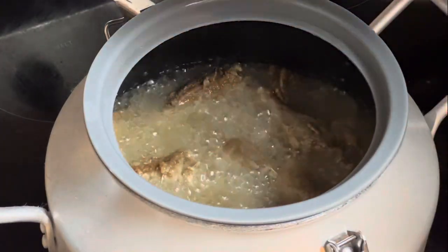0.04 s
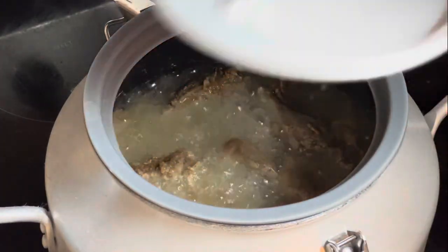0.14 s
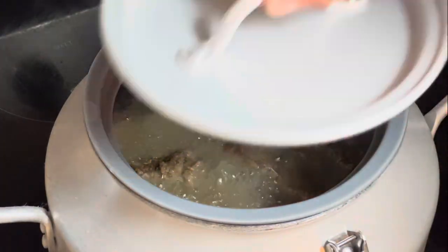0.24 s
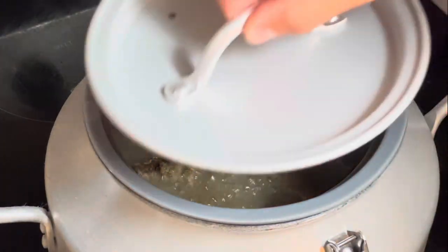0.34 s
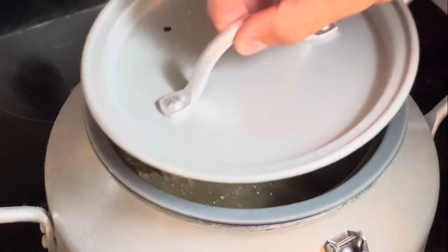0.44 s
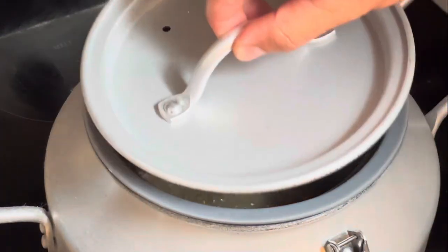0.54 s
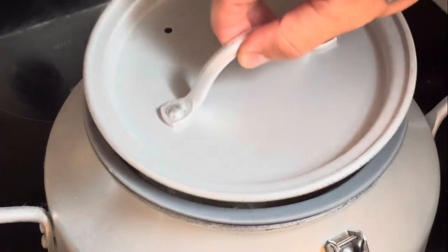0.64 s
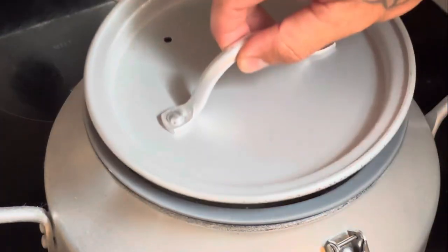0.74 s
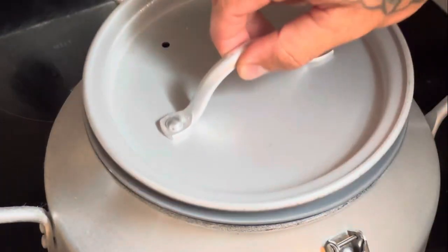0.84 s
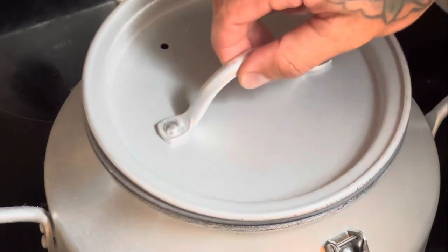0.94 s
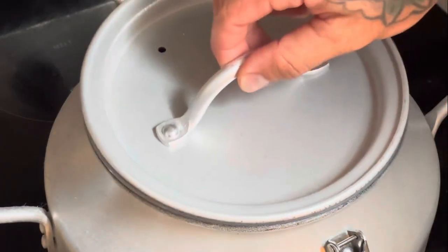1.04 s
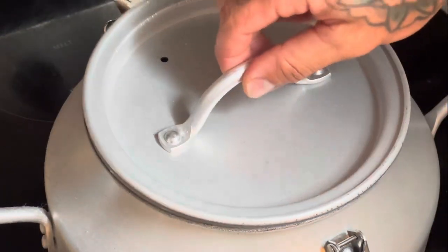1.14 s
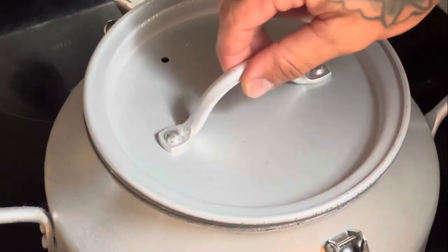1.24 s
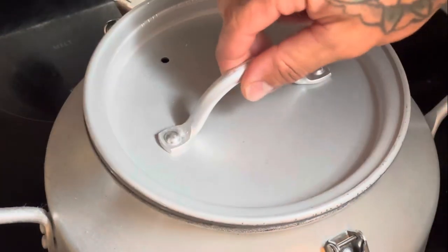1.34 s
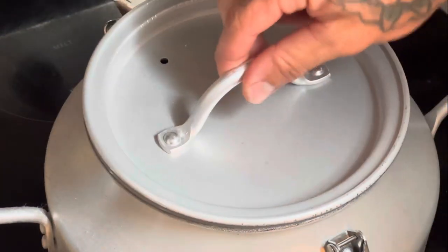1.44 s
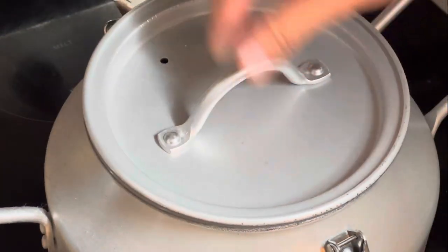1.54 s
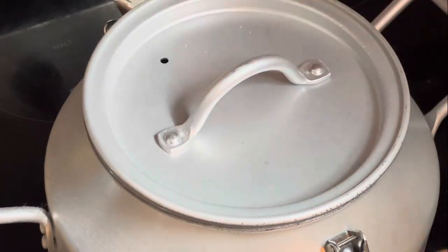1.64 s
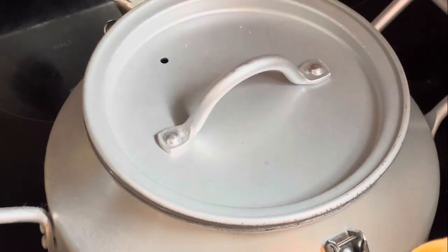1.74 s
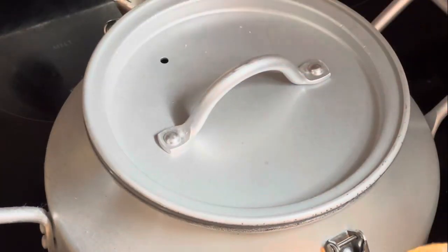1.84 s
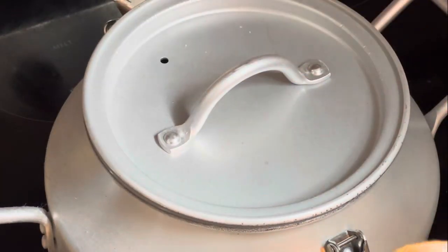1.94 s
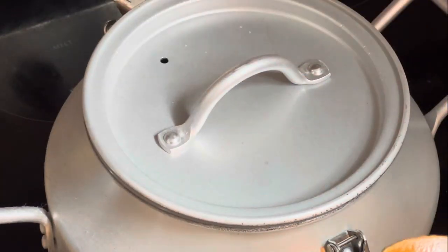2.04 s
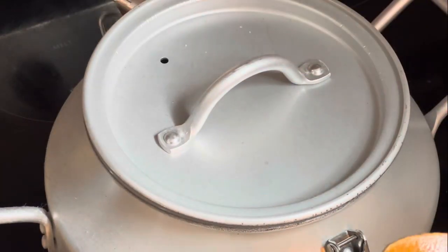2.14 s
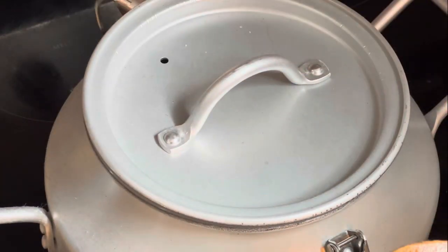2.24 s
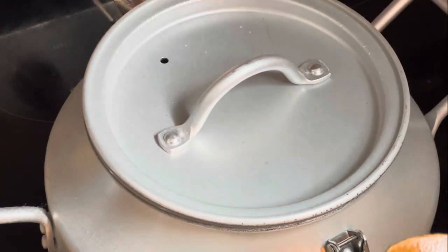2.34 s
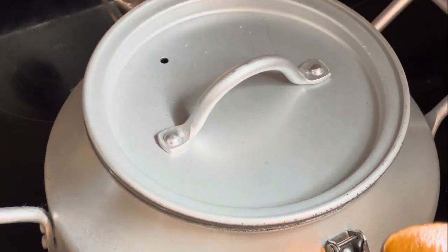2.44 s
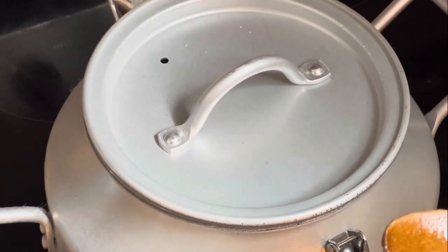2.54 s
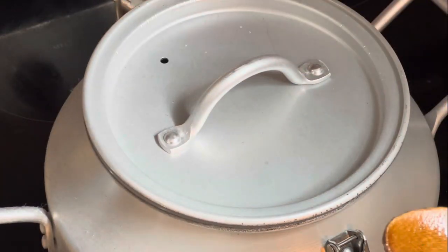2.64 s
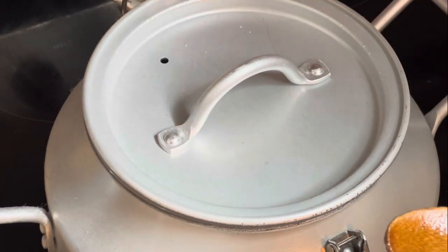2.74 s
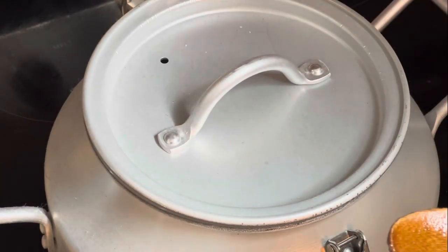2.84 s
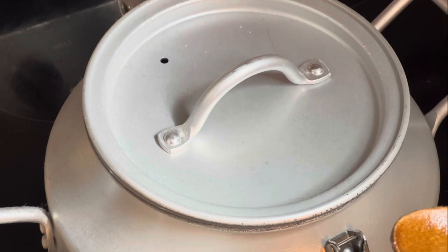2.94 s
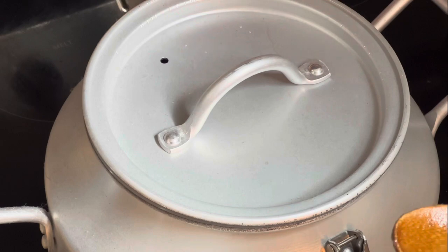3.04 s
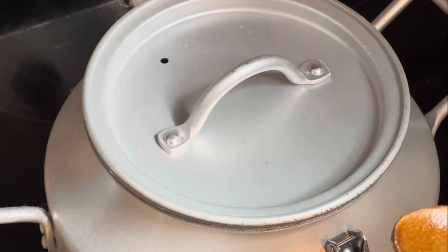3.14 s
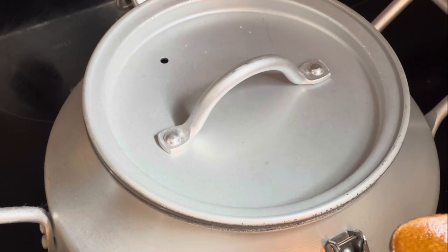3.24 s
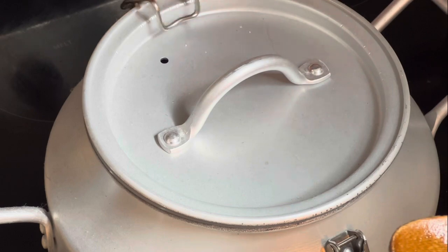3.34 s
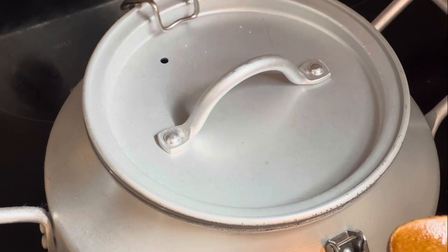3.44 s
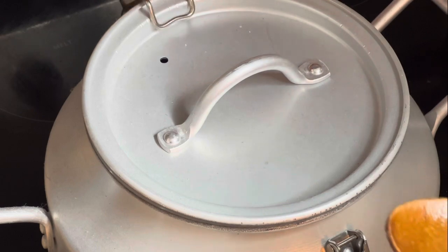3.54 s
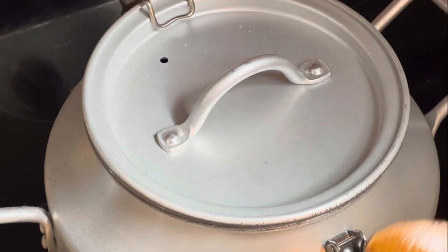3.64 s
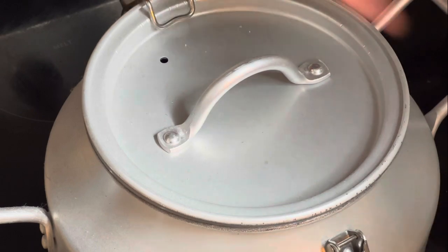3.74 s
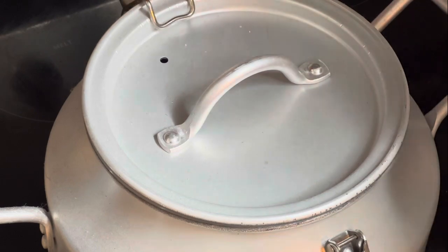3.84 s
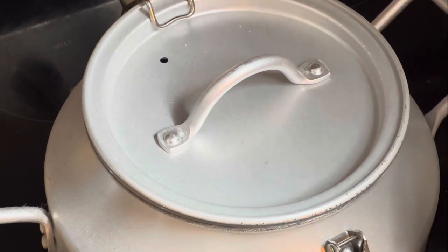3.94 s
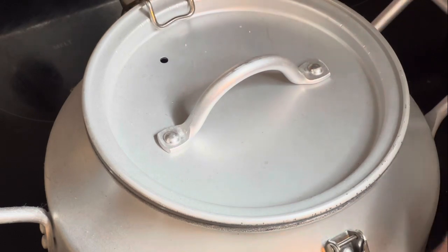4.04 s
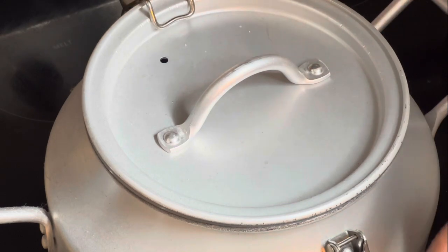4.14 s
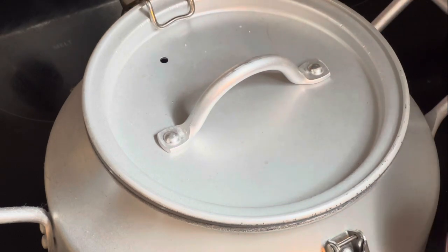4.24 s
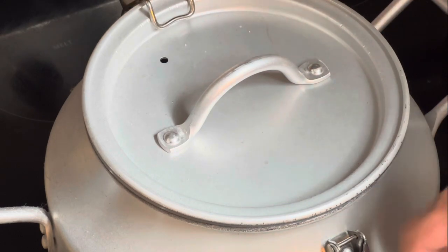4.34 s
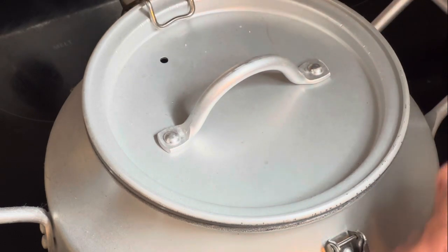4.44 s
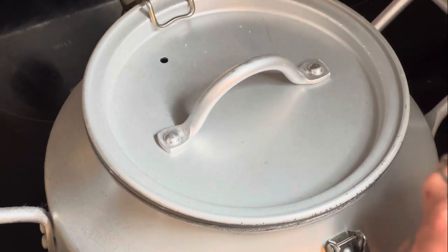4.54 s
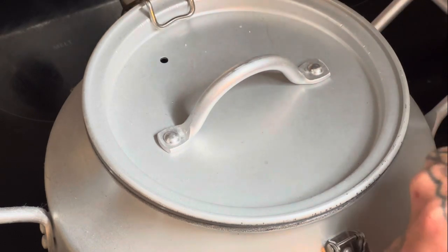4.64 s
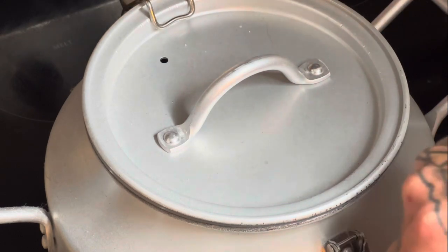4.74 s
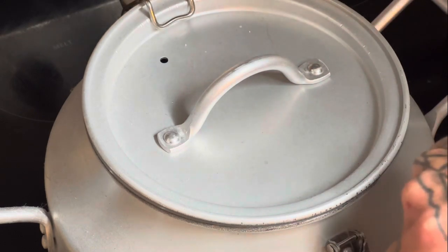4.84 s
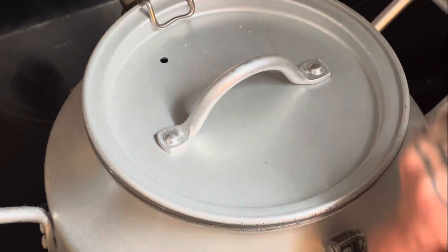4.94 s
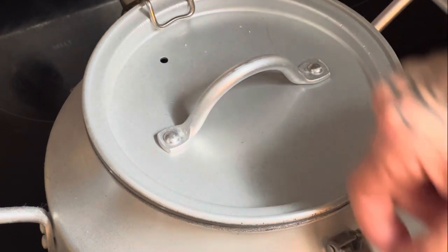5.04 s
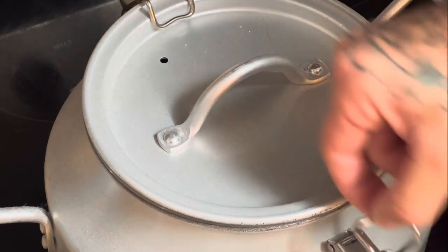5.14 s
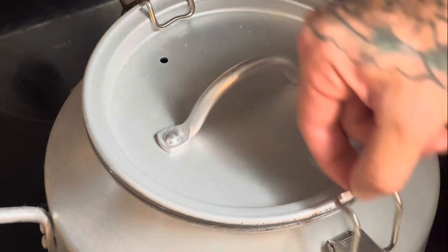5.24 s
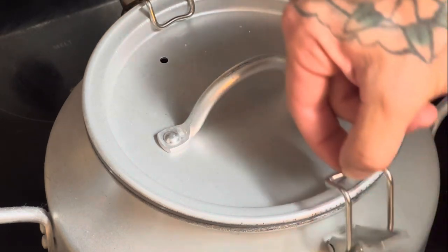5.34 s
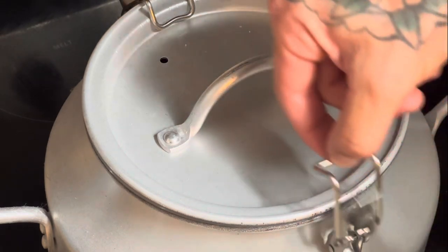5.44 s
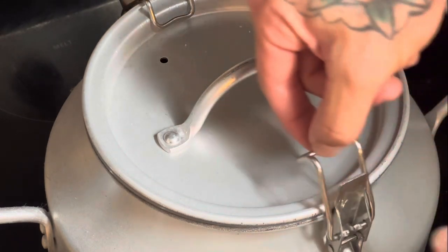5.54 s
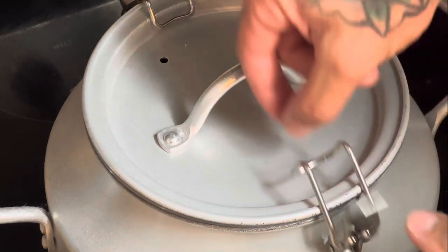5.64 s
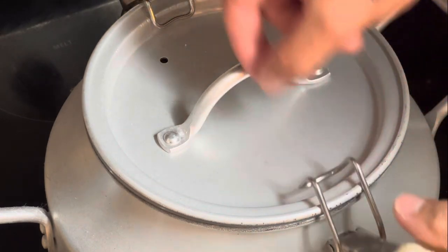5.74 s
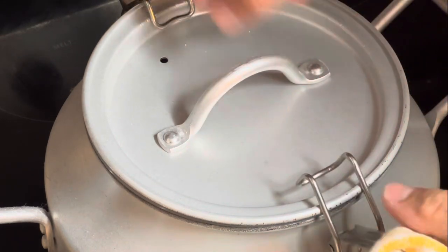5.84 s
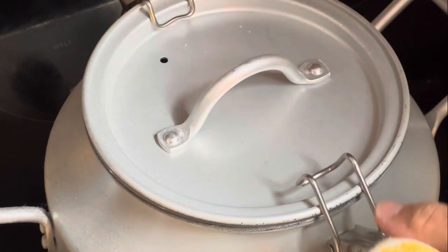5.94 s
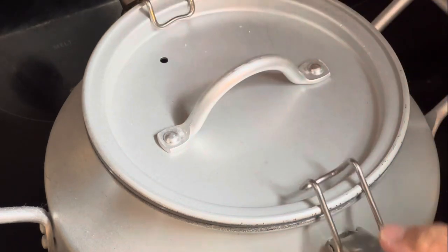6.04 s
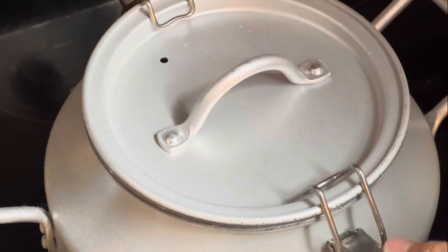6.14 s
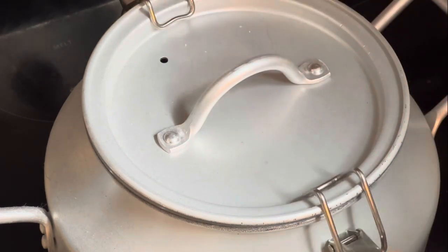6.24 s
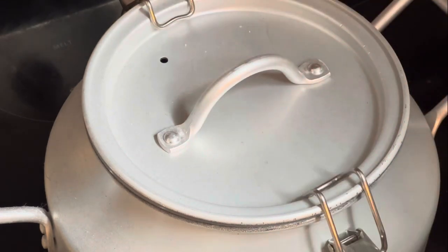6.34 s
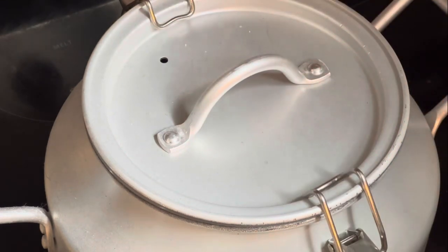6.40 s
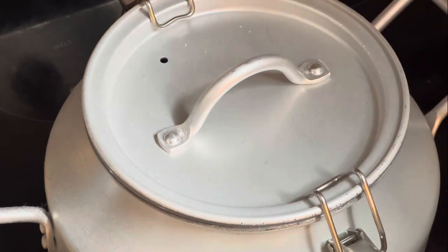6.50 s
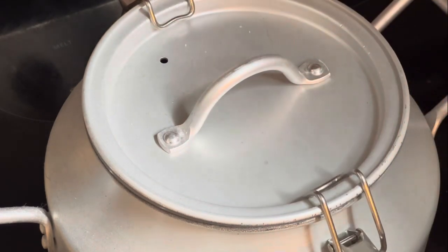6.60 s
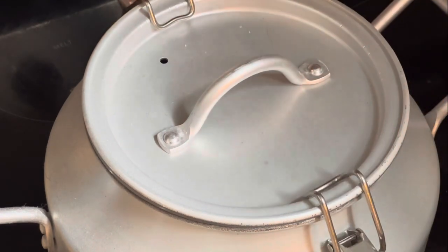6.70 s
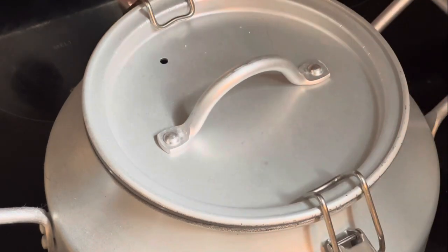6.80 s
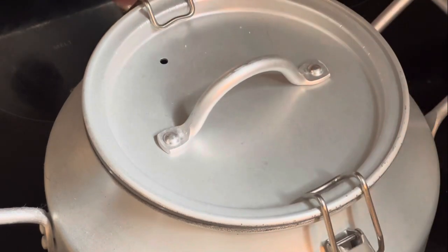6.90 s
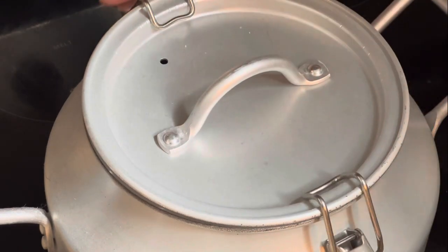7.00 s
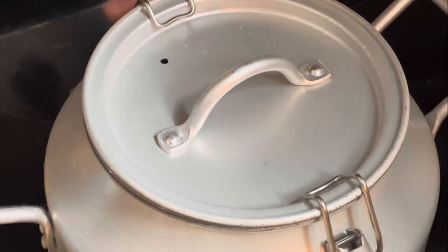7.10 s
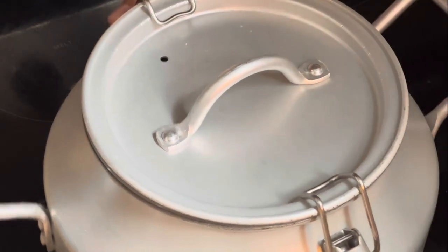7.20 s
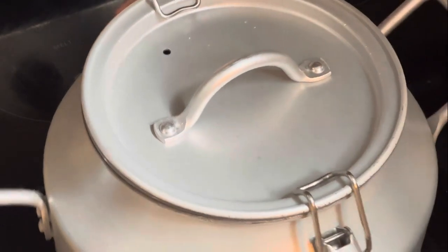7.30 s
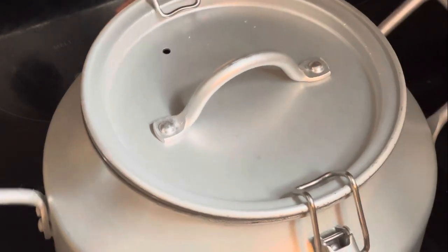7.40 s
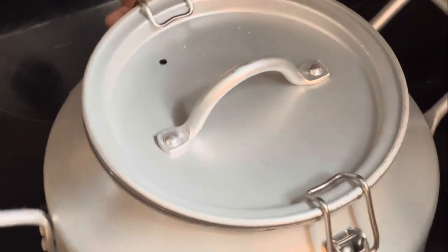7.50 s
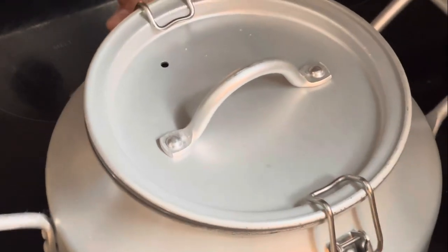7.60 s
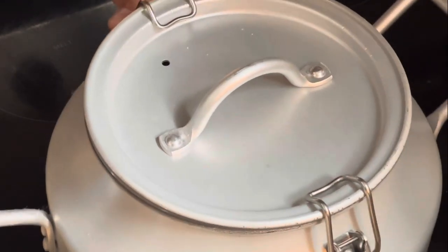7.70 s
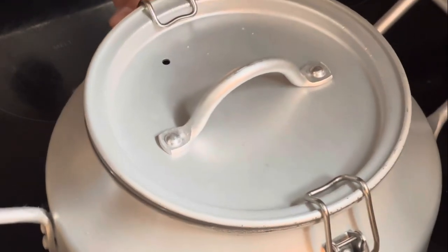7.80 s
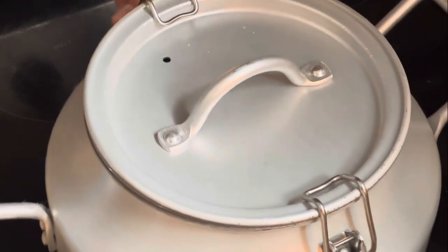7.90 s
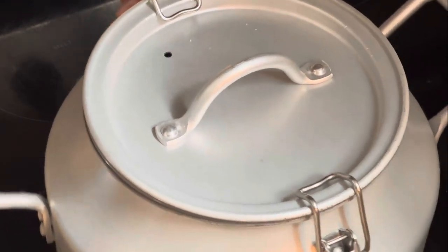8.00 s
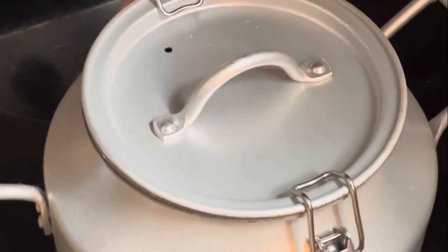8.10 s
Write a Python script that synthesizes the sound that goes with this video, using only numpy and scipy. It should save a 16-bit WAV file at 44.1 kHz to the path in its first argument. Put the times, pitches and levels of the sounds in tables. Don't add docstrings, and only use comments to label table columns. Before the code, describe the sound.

Close stereo view of a metal can on a stove in a small kitchen. At the start meat sizzles brightly in oil, a dense, fine fizz. Within the first second a lid descends; the can's hollow air note slides down and the sizzle becomes softer. Around 0.9-1.2 s the rim meets the gasket with a light tick and low soft bumps. Quiet frying continues with scattered sharp spits and dull pops. At 2.7 s a far wire latch taps the lid and springs back, drops harder at 3.3 and bounces with a thud at 3.5. The near wire clatters at 5.5-5.7, with a faint touch at 6.3 and a soft knock at 6.7. The loudest lever snap cracks at 7.1, rocking the can; a weaker one follows at 7.5. Low stove rumble swells with handling, a far motor rises and falls around 3-4.5, and a faint fridge hum enters near 4.5.

```python
import sys
import numpy as np
from scipy import signal
from scipy.fft import rfft, irfft
from scipy.io import wavfile

SR = 44100
rng = np.random.default_rng(int(sys.argv[2]) if len(sys.argv) > 2 else 0)


def store_pcm(level_fs):
    pcm = np.round(np.clip(level_fs, -1, 1) * 32767).astype(np.int16)
    wavfile.write(sys.argv[1], SR, np.atleast_2d(pcm).T)


def gain_from_decibels(decibels):
    exponent = np.asarray(decibels, float) / 20
    return 10 ** exponent


N = 359856

CROSS_HZ = 1040

# pitch_hz, level_db, t60_s (time to fade by 60 dB)
LID = [(315, -8, 0.05), (656, -3, 0.043), (1140, -6, 0.05), (3520, 13, 0.06), (4220, 9, 0.089),
       (4680, 4.5, 0.08), (5580, 1.5, 0.2), (5980, 12, 0.07), (6303, 6, .07), (7500, 2, 0.05)]
CAN = [(372, 8, 0.07), (505, 3, 0.13), (1017, -3, .2), (1098, 6, 0.07), (834, -3, .15), (1564, 8, 0.06),
       (2050, 7, .07), (2672, 9, 0.06), (2720, -8, .25), (2982, 0, 0.2), (3090, -2, .2), (3850, 4, 0.17),
       (4694, -2, .15), (8430, 11, 0.078)]
FAR_WIRE = [(1065, -2, 0.12), (1148, 0, 0.13), (1195, 12, 0.16), (2097, 0, 0.16), (3186, 5, 0.12),
            (4148, 8, 0.09), (5372, 8, .06), (6070, 3, .06), (6309, 2, 0.1), (7020, 2, .08),
            (7488, 11, 0.08), (8870, 9, 0.09), (9262, 2, .12), (10917, 11, .07)]
FAR_REBOUND = [(487, 4, .1), (1145, 4, .12), (1192, 9, .19), (2099, -6, .19), (2915, 0, .25),
               (3186, 3, .15), (8333, 5, .1), (4150, -4, .2), (5264, -2, .12), (5620, -6, .25),
               (6266, -1, .15), (6790, -2, .25), (7472, 0, .2), (9092, 4, .1)]
FAR_DROP = [(168, -6, 0.19), (1090, -1, 0.2), (1140, 2, .2), (1195, 10.5, 0.26), (1275, -9, .08),
            (2094, 1.5, 0.17), (3189, 3, 0.18), (4770, -10, .24), (5184, 4, .07), (5612, -6, .15),
            (6411, 5, .06), (7020, -5, 0.17), (7697, 3, 0.17), (14300, 1, .12)]
FAR_HINGE = [(8350, 8, .16), (8540, 0, .1), (8790, 0, .2), (8885, 11, 0.14), (9105, 5, .13),
             (9232, 14, .07), (9266, 5, .28), (9695, 5, .19), (10880, -8, .17), (11160, -8, .06),
             (13910, -8, .06)]
FAR_BOUNCE = [(172, -0.5, 0.15), (1138, 2, 0.25), (1195, 7, 0.15), (2024, 2, 0.2), (2777, -1, 0.18),
              (3022, 3, 0.1), (3190, -3, 0.24), (3594, 4, 0.27), (5550, 8, 0.056), (6170, 10, .07),
              (6530, 8, .1), (6650, -3, .26), (6870, 7, 0.17), (9135, 15, 0.08)]
FAR_EYE = [(6330, 3, .2), (7025, 3, .2), (7445, 8, .08), (8311, 2, .2), (8537, 10, .08), (8979, 8, .08),
           (9846, 8, .12)]
NEAR_WIRE = [(1132, 18, 0.13), (1205, 11, .13), (2995, 17, 0.1), (3133, 5, .12), (4161, 8, 0.07),
             (4893, 15, 0.085), (5097, 14, .06), (5634, 12, 0.13), (6303, 15, .07), (6401, 14, 0.1),
             (7070, 15, 0.1), (8871, 17, .08), (9329, 15, 0.12), (11540, 6, 0.12), ]
NEAR_BOUNCE = [(170, 1, 0.078), (1145, 5, 0.08), (1190, 4, 0.24), (3142, -6, 0.2), (4320, -3, .1),
               (4963, -5, .17), (6233, 11, 0.08), (6320, -5, .25), (6800, 3, .15), (8397, 6, 0.09),
               (7197, 5, 0.09), (7720, 6, 0.13), (8850, 13, .07), (9124, 6, 0.12)]
NEAR_TWIST = [(1190, -6, .1), (3436, 13, .055), (7477, 6, .08), (14906, 6, .06), (3142, -2, .15),
              (5049, 0, .06), (6233, 2, .08), (7197, 2, .07), (9140, 4, .07)]
NEAR_SETTLE = [(1190, 2, .2), (3138, -6, 0.2), (3500, 0, .05), (4662, 3, 0.1), (4823, 3, .1),
               (5910, 6, 0.12), (5986, 9, .1), (7170, 8, 0.082), (8424, 6, .1), (9109, -3, 0.2),
               (13190, -8, 0.09)]
LOOP_LIFT = [(485, 3, .05), (1130, 3, .15)]
LOOP = [(1130, 5, 0.15), (2030, -2, .08), (3150, 1.5, 0.1), (4145, 3, 0.1), (5000, -2, .04),
        (5776, -3, 0.08)]
KNUCKLE = [(310, -2, .07), (495, 6, .08), (700, -1.5, .05), (880, -2.5, .04), (1100, -2.5, .04)]
FIRST_LEVER = [(4161, 10, .06), (4236, 4, .16), (4867, -10, .4), (4931, 4, .05), (5130, 6, .045),
               (5216, 7, .045), (5765, 7, .04), (7730, 8, .07), (8960, 6, .14), (9183, 8, .06),
               (9356, -4, .24), (9711, 3, .12), (9841, -2, .17), (12850, -1.5, 0.062)]
SECOND_LEVER = [(300, 2, .08), (382, 11, 0.17), (680, 5, 0.15), (1044, 3, 0.052), (2975, 6, 0.16),
                (3840, 2, 0.14), (4150, -3, 0.074), (4769, 2, .04), (4931, 17, 0.06), (4920, -10, .3),
                (8338, 12, 0.06), (9390, 5, .1), (8936, 9, 0.08), (9684, -2, 0.1)]


def in_time(rows):
    s, *columns = np.transpose(rows)
    return [np.interp(np.arange(N) / SR, s, column) for column in columns]


def at_hz(points, hz, column=1):
    table = np.array(points, float)
    return np.interp(np.log(hz + 1), np.log(table[:, 0] + 1), table[:, column])


def rms_one(x):
    return x / np.sqrt(np.mean(x ** 2) + 1e-20)


def coloured(x, points):
    hz = np.fft.rfftfreq(N, 1 / SR)
    below = np.minimum(hz / points[0][0], 1) ** 3
    return rms_one(irfft(rfft(x) * gain_from_decibels(at_hz(points, hz)) * below, N))


def drift(rate_hz):
    r = np.exp(-2 * np.pi * rate_hz / SR * 20)
    white = rng.standard_normal(N // 20 + 4002)
    slow = signal.lfilter([1], [1, -2 * r, r * r], white)[4000:]
    return np.interp(np.arange(N) / 20, np.arange(len(slow)), rms_one(slow))


def ring(clicks, hz, t60):
    r = gain_from_decibels(-60 / (t60 * SR))
    w = 2 * np.pi * hz / SR
    return signal.lfilter([0, np.sin(w)], [1, -2 * r * np.cos(w), r * r], clicks + 1e-18)


def add(out, s, sound):
    i = round(s * SR)
    out[i:i + len(sound)] += sound[:N - i]


def wavering(hz, level_db, width_hz):
    turn = 2 * np.pi * np.cumsum(hz) / SR
    return gain_from_decibels(level_db) * (drift(width_hz) * np.cos(turn) + drift(width_hz) * np.sin(turn))


def smooth_rise(s, width_s):
    return .5 + .5 * np.tanh((np.arange(N) / SR - s) / width_s)


def sizzle(level_db):
    # pitch_hz, level_db (per Hz)
    frying = [(700, -10), (1100, -5.5), (1600, -4), (2300, -2.5), (3100, .8), (4000, .8), (4900, -1.5),
              (6300, 0.5), (8200, -1), (9800, -1.5), (11300, -11), (13000, -12.5), (15200, -7)] + [(15800, -17), (16100, -45)]
    bursts_per_s, size_spread_db, cycles = 3500, 2.6, 12.8
    sizes = gain_from_decibels(size_spread_db * np.minimum(rng.exponential(1, N), 6)) * rng.choice([-1, 1], N)
    clumping_db = 3.0 * drift(30) + 1.3 * drift(4)
    born = rng.random(N) < bursts_per_s * gain_from_decibels(clumping_db) / SR
    dealt = rng.integers(0, 16, N)
    fizz = np.zeros(N)
    for k, hz in enumerate(np.geomspace(900, 15500, 16)):
        fizz += ring(sizes * born * (dealt == k), hz, cycles / hz) * hz / 4000
    bed = rng.standard_normal(N) * gain_from_decibels(0.31 * drift(45))
    fry = coloured(rms_one(fizz) + bed, frying)
    lows = signal.sosfiltfilt(signal.butter(2, 2400, fs=SR, output="sos"), fry)
    opening = np.clip((level_db + 53) / 14, 0, .45)
    return gain_from_decibels(level_db + 3.0) * (fry - opening * lows)


def spits():
    # start_s, peak_db, pitch_hz
    oil_spits = [(0.8789, -40, 5920), (0.9995, -46, 2770), (1.351, -35, 6600), (1.4674, -45, 6480),
                 (1.488, -35, 9700), (1.8697, -31, 5950), (1.919, -39, 3310), (2.1073, -40, 6600),
                 (2.2073, -38, 4150), (2.609, -37, 6370), (3.1557, -36.5, 5786), (4.1925, -46, 3020),
                 (4.4788, -42, 3980), (4.6765, -32.5, 9800), (4.782, -40, 5140), (5.1474, -40, 6300),
                 (5.257, -47, 6100), (5.4054, -36, 5940), (5.828, -41, 5840), (6.0985, -40, 6180),
                 (6.684, -39, 3160), (6.7246, -38, 4240), (6.8049, -39, 3850),
                 (0.93, -42, 1260), (2.109, -41.5, 1400), (2.985, -48.5, 620), (3.12, -47, 1040),
                 (3.158, -47, 993), (4.142, -48, 1000), (1.47, -46, 2000)]
    out, t = np.zeros(N), np.arange(900) / SR
    for s, peak_db, hz in oil_spits:
        puff = rng.standard_normal(len(t)) * np.exp(-t / 0.0033)
        pop = ring(puff, hz, 14.0 / hz)
        add(out, s, gain_from_decibels(peak_db - 1.0) * pop / np.abs(pop).max())
    return out


def lowered_lid():
    # time_s, pitch_hz
    neck = [(0, 470), (.3, 465), (.45, 425), (.55, 371), (.7, 325), (.9, 275), (1.05, 208), (1.2, 150)]
    neck_hz, = in_time(neck)
    gap = (neck_hz - neck_hz[-1]) / (neck_hz[0] - neck_hz[-1])
    return neck_hz, gap, smooth_rise(1.06, width_s=0.15)


def can_air(neck_hz, shut):
    neck_db = -59 + np.log2(neck_hz / neck_hz[0]) - 25 * shut
    cross_db = -64.5 - 10 * shut
    neck_note = wavering(neck_hz, neck_db, width_hz=69)
    return neck_note + wavering(np.full(N, CROSS_HZ), cross_db, width_hz=49)


def split_modes(modes):
    out = []
    for hz, level_db, t60 in modes:
        for k in (-1, 0, 1):
            near_hz = hz * (1 + .008 * k * rng.uniform(.4, 1.6))
            out.append((near_hz, level_db - 13 * abs(k), t60 * .5 ** abs(k)))
    return out


def ring_modes(touch, modes, modes_db, t):
    octaves = np.zeros((15, len(t)))
    for hz, level_db, t60 in modes:
        fed = abs(touch[:900] @ np.exp(2j * np.pi * hz * t[:900])) + .5
        octaves[int(np.log2(hz))] += gain_from_decibels(modes_db + level_db) * ring(touch, hz, t60) / fed
    return sum(signal.lfilter(*signal.butter(2, 2 ** k * .6, "high", fs=SR), octaves[k]) for k in range(7, 15))


def blows():
    # part, start_s, clatter_db, brightness_db_per_octave, thud_db, ring_db
    hits = [(LID, 1.127, -43, -2.5, -33, -50), (FAR_WIRE, 2.6635, -27, 5, -19, -37),
            (FAR_WIRE, 2.669, -27, 3, -30, -45), (FAR_WIRE, 2.674, -33, 2, -36, -48),
            (FAR_REBOUND, 2.694, -34, -1.5, -38, -41), (FAR_DROP + FAR_HINGE, 3.3265, -23, 3, -19, -27),
            (FAR_HINGE, 3.333, -24, 3.1, -36, -38), (FAR_BOUNCE, 3.495, -26, 3.3, -34, -42),
            (FAR_BOUNCE + FAR_EYE, 3.501, -22, 1.5, -27, -35), (NEAR_WIRE, 5.4898, -26, 4.7, -35, -46),
            (NEAR_WIRE, 5.496, -32, 3.7, -46, -52), (NEAR_WIRE, 5.501, -34, 2, -46, -58),
            (NEAR_BOUNCE, 5.5935, -34, .8, -31, -39.5), (NEAR_BOUNCE, 5.597, -25, 3.2, -29, -40),
            (NEAR_TWIST, 5.611, -28, 2.9, -37, -42), (NEAR_SETTLE, 5.718, -43, 0, -45, -52),
            (NEAR_SETTLE, 5.725, -41, 1, -45, -56), (NEAR_SETTLE, 5.733, -47, 2, -52, -58),
            (LOOP_LIFT, 6.265, -55, -4, -40, -52), (LOOP_LIFT, 6.277, -52, -1.5, -47, -52),
            (LOOP, 6.288, -47, .6, -42, -51.5), (CAN + FIRST_LEVER, 7.13, -15.5, .6, -36, -30.5),
            (SECOND_LEVER, 7.490, -29, -0.46, -36, -38), (SECOND_LEVER, 7.496, -32, .5, -37, -45),
            (KNUCKLE, 6.700, -54, -5, -53, -41)]
    strokes = [
        (LID, 5.447, -54, -2.4, -52, -70),
        (CAN, 7.212, -46, -2.2, -32, -65),
    ]
    # pitch_hz, level_db, crack_t60_s, tail_t60_s
    rattle = [(150, -17.5, 0.049, 0.39), (507, -8.5, 0.029, 0.31), (1530, -11, 0.038, 0.31),
              (3850, -6, 0.029, 0.16), (7140, 1.5, 0.038, 0.13), (9300, 1, 0.025, 0.25),
              (12000, -11.5, 0.022, 0.1), (15160, -4.5, 0.018, 0.088)]
    out, t = np.zeros(N), np.arange(SR // 4) / SR
    edges = 100 * 2 ** np.arange(0, 7.6, .5)
    centres = np.sqrt(edges[1:] * edges[:-1])
    bank = [signal.butter(2, pair, "band", fs=SR, output="sos") for pair in zip(edges, edges[1:])]
    crack, tail = (gain_from_decibels(-60 * t / at_hz(rattle, centres, column=k)[:, None]) for k in (2, 3))
    rise = 1 - np.exp(-(t / 0.0011) ** 2)
    dying = (crack + gain_from_decibels(-9.5) * (tail - tail[:, -1:])) * rise * np.sqrt(SR / centres)[:, None]
    contacts = [(*row, 0.0035) for row in hits] + [(*row, .017) for row in strokes]
    shimmer_hz = np.geomspace(1800, 15500, 120) * rng.uniform(.99, 1.01, 120)
    for modes, s, clatter_db, bright_db, thud_db, modes_db, chatter_s in contacts:
        colour = [(170, thud_db)]
        colour += [(hz, clatter_db + bright_db * np.log2(hz / 3800)) for hz in (500, 9000)]
        touch = rng.standard_normal(len(t)) * (rng.random(len(t)) < .05)
        touch *= np.exp(-t / chatter_s) * np.minimum(t / 0.0017, 1)
        touch[40] += 1.6
        faint_db = -19.5 - modes_db + at_hz(colour, shimmer_hz) + at_hz(rattle, shimmer_hz)
        faint_db = faint_db + 3 * rng.standard_normal(120)
        faint_t60 = .24 * (4000 / shimmer_hz) ** .3 * rng.uniform(0.56, 1.27, 120)
        ringing = split_modes(modes) + list(zip(shimmer_hz, faint_db, faint_t60))
        sound = ring_modes(touch, ringing, modes_db, t)
        white = rng.standard_normal((2, len(t)))
        for k, hz in enumerate(centres):
            band = signal.sosfilt(bank[k], white[k % 2] * dying[k])
            sound = sound + gain_from_decibels(at_hz(colour, hz) + at_hz(rattle, hz) - 1.5) * band
        add(out, s, sound * np.minimum((t[-1] - t) / .05, 1))
    return out


def bumps():
    # start_s, peak_db, pitch_hz, t60_s
    soft_contacts = [(0.929, -40.5, 204, 0.052), (1.107, -33, 155, 0.044), (1.169, -42, 98, 0.038),
                     (3.501, -27.5, 168, 0.037), (3.548, -41.5, 187, 0.027), (6.261, -51, 460, 0.036),
                     (7.145, -33, 50, 0.064), (7.21, -44, 180, .06), (7.28, -42, 68, .07)]
    out = np.zeros(N)
    for s, peak_db, hz, t60 in soft_contacts:
        push = np.zeros(SR // 3)
        push[0] = 1
        note = np.zeros(len(push))
        for k, share in ((1, 0.97), (1.5, 0.31), (2.3, 0.15)):
            swell = ring(push, k * hz, t60)
            note += share * ring(swell, k * hz, t60)
        add(out, s, gain_from_decibels(peak_db + 3.5) * note / np.abs(note).max())
    return out


def echo(x, gap_s, t60):
    t = np.arange(SR // 3) / SR
    response = rng.standard_normal(len(t)) * gain_from_decibels(-60 * t / t60) * (t > gap_s)
    return signal.oaconvolve(x, response / np.sqrt(np.sum(response ** 2)))[:N]


def stove_rumble():
    # pitch_hz, level_db (per Hz)
    rumble_colour = [(12, -45), (20, -4.5), (65, 3.5), (97, 0.5), (114, -19), (151, -10), (393, -18),
                     (445, -19.5), (800, -22), (1040, -53), (1760, -120)]
    # peak_s, peak_db
    shakes = [(.3, -65), (.85, -64.5), (1.12, -59), (2.45, -64.5), (2.72, -62), (3.12, -60), (3.5, -56),
              (4.05, -63), (4.33, -62), (5.62, -61), (5.95, -65), (6.9, -58.5), (7.22, -51.5), (8.05, -62)]
    t, power = np.arange(N) / SR, gain_from_decibels(-66.5) ** 2
    for s, peak_db in shakes:
        swell = np.exp(np.where(t < s, (t - s) / .06, (s - t) / .16))
        power = power + gain_from_decibels(peak_db) ** 2 * swell
    unsteady = gain_from_decibels(2.5 + 1.6 * drift(2.8))
    return np.sqrt(power) * unsteady * coloured(rng.standard_normal(N), rumble_colour)


def murmur():
    # pitch_hz, level_db (per Hz)
    murmur_colour = [(76, -44), (130, -1.5), (391, -9.5), (445, -9), (531, -10), (800, -16.5), (1040, -41),
                     (1760, -120)]
    return gain_from_decibels(-66) * coloured(rng.standard_normal(N), murmur_colour)


def fridge():
    hum = np.sqrt(2) * np.sin(2 * np.pi * 267.6 * np.arange(N) / SR)
    return smooth_rise(4.53, width_s=.12) * gain_from_decibels(-70 + 3.9 * drift(4.6)) * hum


def far_motor():
    # time_s, pitch_hz, level_db
    revs = [(0, 89.7, -63), (.5, 90, -76), (1.7, 87.3, -66), (2.4, 95, -87), (3.0, 115, -60.5),
            (3.8, 134, -70), (4.2, 120.2, -62.5), (4.35, 101, -59.5), (4.7, 97.8, -65), (6.5, 90.3, -74),
            (8.16, 88, -63)]
    return wavering(*in_time(revs), width_hz=3.1)


def two_ports(mid, knocks, room_t60_s):
    # pitch_hz, lead_radians
    port_lead = [(0, 0), (2300, 0), (3300, .25), (4700, 0), (6500, 0), (7350, 1.0), (7750, 3.0),
                 (8650, 3.14), (8900, 2.4), (9150, 1.7), (10000, .9), (10700, 0), (13000, 0), (14000, -1.1),
                 (15500, -2.2), (16400, -2.5)]
    # pitch_hz, level_db
    diffuse = [(30, -27), (150, -21), (300, -11), (550, -9.5), (900, -5.5), (1300, -13), (1700, -26),
               (3500, -21), (5000, -32.5), (7000, -22), (8300, -34), (9500, -9), (11500, -21), (14500, -12)]
    hz = np.fft.rfftfreq(N, 1 / SR)
    lead = np.exp(.5j * at_hz(port_lead, hz))
    unlike = rfft(echo(mid, gap_s=0.00058, t60=0.091)) * gain_from_decibels(at_hz(diffuse, hz))
    walls = signal.sosfilt(signal.butter(2, [300, 3600], "band", fs=SR, output="sos"), knocks)
    unlike = unlike + rfft(gain_from_decibels(-21.5) * echo(walls, gap_s=0.004, t60=room_t60_s))
    return np.array([irfft(rfft(mid) * lead + unlike, N), irfft(rfft(mid) / lead - unlike, N)])


def scene():
    room_t60_s = 0.5
    neck_hz, gap, shut = lowered_lid()
    shade = np.exp(-np.arange(N) / SR / 0.16)
    sizzle_db = -54 + 4.5 * np.sqrt(gap) + 5.0 * shade
    frying = sizzle(sizzle_db) + spits() + can_air(neck_hz, shut)
    knocks = blows() + bumps()
    softened = signal.lfilter(*signal.butter(1, 6000, fs=SR), knocks)
    room = gain_from_decibels(-15) * echo(softened, gap_s=0.0036, t60=room_t60_s)
    background = stove_rumble() + murmur() + fridge() + far_motor()
    return two_ports(frying + knocks + room + background, knocks, room_t60_s)


def band_limit(x):
    return signal.sosfilt(signal.butter(12, 16800, fs=SR, output="sos"), x)


def record(dry):
    rounded = dry / (1 + np.abs(dry / .9) ** 6) ** (1 / 6)
    no_top = signal.sosfilt(signal.cheby2(14, 70, 16700, fs=SR, output="sos"), rounded)
    mix = signal.sosfilt(signal.butter(4, 36, "high", fs=SR, output="sos"), no_top)
    return band_limit(mix)


dry = scene()
out = record(dry)
store_pcm(out)
```